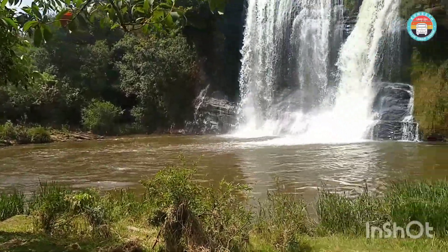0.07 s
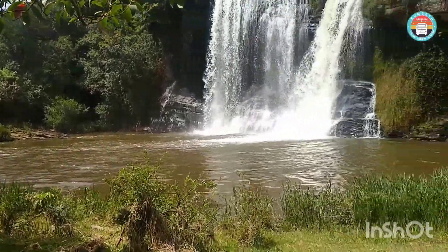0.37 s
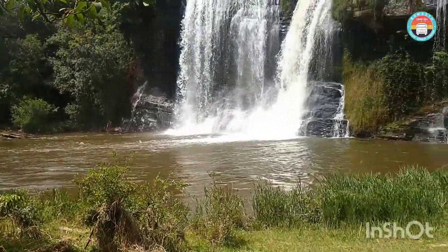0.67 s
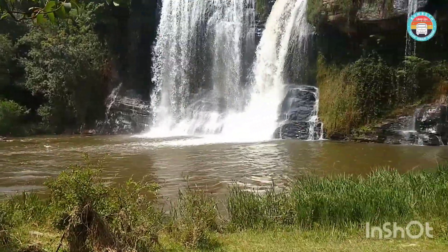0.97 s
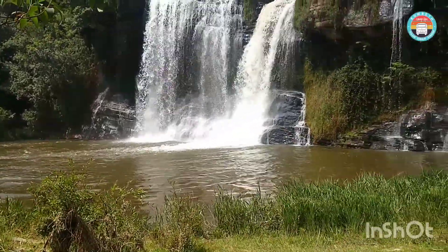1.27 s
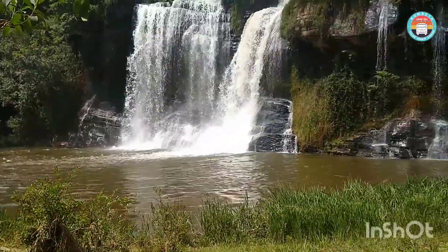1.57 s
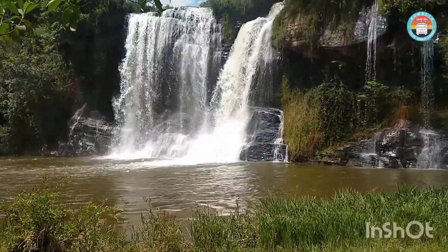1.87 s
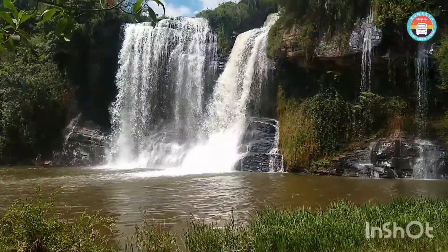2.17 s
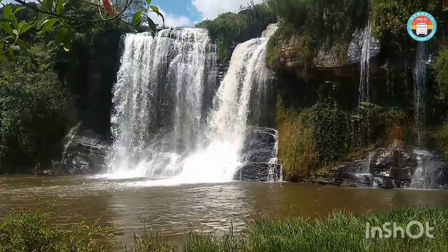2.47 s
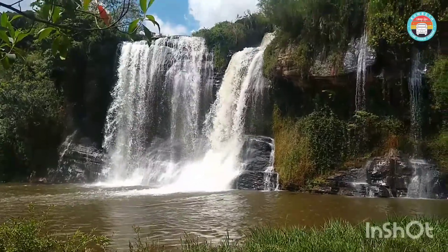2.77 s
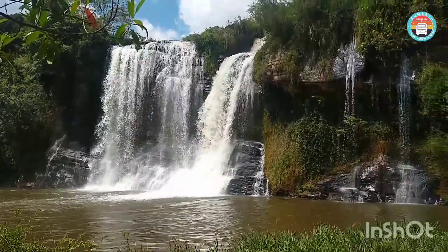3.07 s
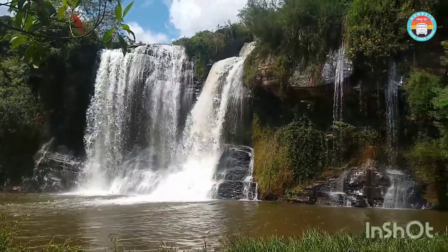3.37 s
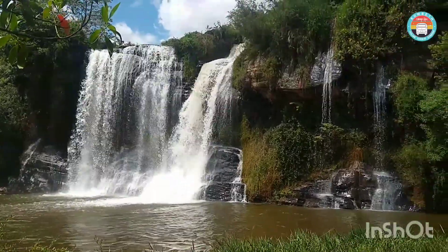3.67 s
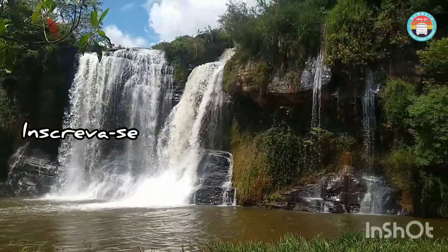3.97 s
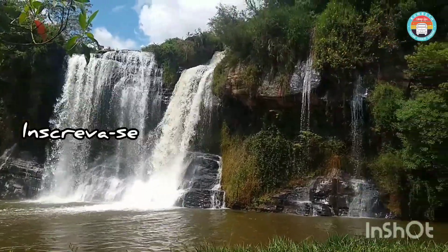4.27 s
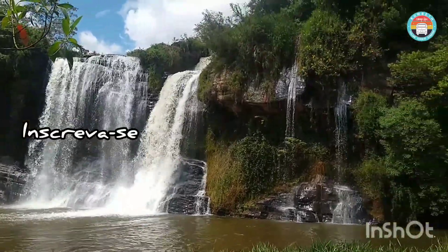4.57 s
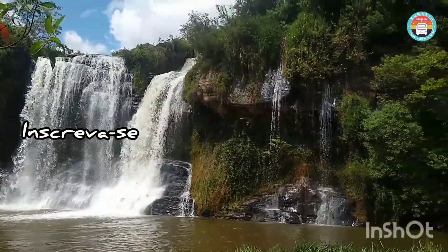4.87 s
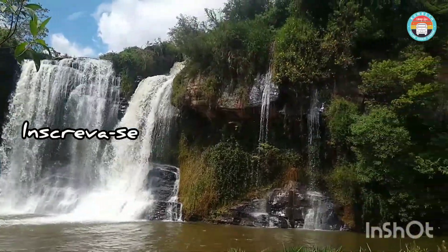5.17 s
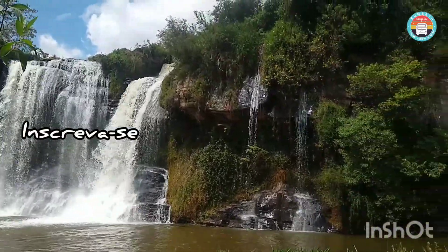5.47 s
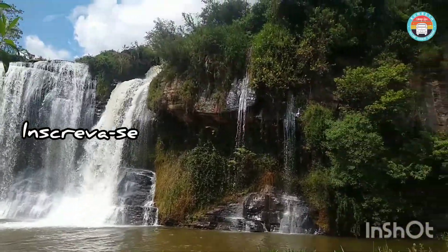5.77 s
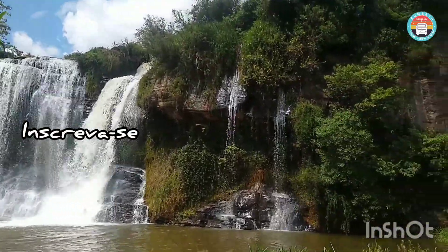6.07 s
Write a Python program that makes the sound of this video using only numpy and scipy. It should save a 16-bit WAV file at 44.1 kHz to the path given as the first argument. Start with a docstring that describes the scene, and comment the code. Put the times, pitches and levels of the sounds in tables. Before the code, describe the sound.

Falling water roars from start to finish, a dense, even rush with a deep plunge underneath and hissing spray on top. It is picked up in stereo from the bank of an open-air pool facing the waterfall. The flow swells very slightly near the start, then holds steady. Toward the end the microphone swings gradually aside, so the low rumble and rush ease while the hiss lingers.

```python
"""A wide waterfall drops over a cliff into a pool, heard across the water from a grassy bank.
From the start the plunge booms, the falling sheets rush and the spray hisses, all shaped from noise
and coloured by the ground's reflection. Just before one second, a heavier surge swells and subsides.
The two-port microphone keeps slowly turning away, so towards the end the roar fades and shifts in tone."""
import sys
import numpy as np
from scipy import signal
from scipy.io import wavfile
from scipy.ndimage import uniform_filter1d

SR = 44100
rng = np.random.default_rng(int(sys.argv[2]) if len(sys.argv) > 2 else 0)


def generate_wav(signal):
    """Clip the signal to [-1, 1] and save it as 16-bit WAV at the path in sys.argv[1]."""
    frames = np.transpose(np.atleast_2d(signal))
    scaled = np.clip(frames, -1, 1) * 32767
    pcm = np.round(scaled).astype(np.int16)
    wavfile.write(sys.argv[1], SR, pcm)


N = 269451
FRAME, HOP = 2048, 512  # samples
HZ = np.fft.rfftfreq(FRAME, 1 / SR)
TIMES = np.arange(N // HOP + 2) * HOP / SR
PLUNGE_TO_RUSH_HZ, RUSH_TO_SPRAY_HZ = (248, 500), (4240, 6850)  # crossovers between the layers

# Base tone of the roar, facing the fall: (frequency [Hz], level [dB per Hz])
ROAR_SPECTRUM = [(20, -96), (42, -101), (72, -77), (160, -61), (600, -62), (1050, -60.5), (1380, -64.5),
                 (1650, -63.5), (2450, -62.5), (3000, -59.5), (3380, -57.5), (3900, -62.5), (4400, -70.3),
                 (5000, -75.6), (6800, -79.5), (7900, -81.5), (9200, -79.5), (10200, -78), (12000, -81),
                 (15000, -87.5)]
def waterfall():
    """Amplitude of the roar over time and frequency: boom, rush and hiss ride on one flow."""
    layers_db = plunge() + sheets() + clumps() + spray()
    return gain_of(over_hz(ROAR_SPECTRUM) + layers_db + flow())


def plunge():
    """Low end, in dB: the boom of water hitting the pool fades with the turn."""
    return (1 - crossover(*PLUNGE_TO_RUSH_HZ)) * fade(turned_db=-9, hold=2.3)


def sheets():
    """Midrange, in dB: the rush of the falling sheets fades slightly ahead of the boom."""
    band = crossover(*PLUNGE_TO_RUSH_HZ) - crossover(*RUSH_TO_SPRAY_HZ)
    return band * fade(turned_db=-9, hold=2.11)


def clumps(depth_db=0.87):
    """Texture, in dB: water lands in clumps, roughening the lows and mids."""
    return depth_db * (1 - crossover(1800, 2800)) * patches(frames=6, bins=24)


def spray(flicker_db=1.4):
    """Top end, in dB: the spray fades least; the hiss flickers slightly at random."""
    flicker = flicker_db * patches(frames=4, bins=20)
    return crossover(*RUSH_TO_SPRAY_HZ) * (fade(turned_db=-4.5, hold=3) + flicker)


def flow(surge_s=0.79, surge_width_s=0.37, surge_db=0.6, waver_db=0.25):
    """Level ride, in dB: the water pours almost evenly, with one surge and a slight random waver."""
    rates_hz = np.geomspace(2, 14, 20)
    waver = sum(np.sin(2 * np.pi * (hz * TIMES + rng.random())) / np.sqrt(hz) for hz in rates_hz)
    surge = np.exp(-((TIMES - surge_s) / surge_width_s) ** 2)
    return (surge_db * surge + waver_db * waver / waver.std())[:, None]


def splashes():
    """Countless overlapping splashes blur into white noise, made as short-time spectra."""
    real, imaginary = rng.standard_normal((2, len(TIMES), len(HZ)))
    return real + 1j * imaginary


def ground_reflection(mid_turn_delay_s=0.002074, strength=0.42, grass_cutoff_hz=1480, phase_rad=1.27):
    """The bounce off the bank comb-filters the roar; grass soaks up the bounce's treble."""
    bounce = strength * np.exp(-(HZ / grass_cutoff_hz) ** 3)
    # the detour shortens as the microphone moves, so the notches drift upwards
    delay_s = mid_turn_delay_s * (1 - 0.063 * (turn() - .5))
    return abs(1 - bounce * np.exp(-1j * (2 * np.pi * HZ * delay_s + phase_rad)))


# The microphone's slow swing: (time [s], turn [0-1])
TURN_CURVE = [(0, 0), (.6, 0.15), (2.6, 0.47), (6.11, 1)]
def turn():
    """How far the microphone has turned, one row per frame: 0 faces the fall, 1 is fully turned."""
    return np.interp(TIMES, *np.transpose(TURN_CURVE))[:, None]


def fade(turned_db, hold):
    """A layer's fade in dB as the microphone turns; a higher hold keeps it up longer."""
    return turned_db * turn() ** hold


# How alike the two ports sound: (frequency [Hz], coherence [0-1])
PORT_COHERENCE = [(45, 0.5), (90, 0.92), (170, 0.96), (300, 0.95), (385, 0.62), (460, 0.88), (620, 1),
                  (840, 0.9), (1000, 1), (1200, 1), (1400, 0.9), (2200, 0.99), (3300, 0.95), (4450, 1),
                  (5000, 0.88), (5550, 0.9), (6150, 0.8), (6700, 0.8), (8700, 0.85), (10600, 0.7),
                  (12000, 0.2), (15000, 0.4)]
# How far the left port trails the right at mid-turn: (frequency [Hz], phase [rad])
LEFT_LAG = [(100, 0), (340, 0.6), (420, -0.6), (600, 0), (800, 0.3), (900, -0.15), (1200, 0), (1650, 0.9),
            (1900, 1.85), (2190, 3.14), (3320, 6.28), (4420, 9.42), (6660, 15.7), (8730, 22), (10650, 28.3),
            (12700, 34.6), (13200, 36.9), (13750, 37.7), (14350, 40.8), (15200, 44)]
# Stereo width of the hiss, the share with the left-right lag reversed: (frequency [Hz], share [0-1])
REVERSED_LAG_SHARE = [(1400, 0.24), (1900, 0.17), (2700, 0.1), (3900, 0.1), (5000, 0.24), (7300, 0.2),
                      (8300, 0.35), (10000, 0.06), (13000, 0.3)]
def stereo_splashes(narrowing=1.2, diffuse_loss=0.95):
    """Stereo width: both ports hear nearly the same splashes, the left one later."""
    past_mid_turn = turn() - .5
    # the body of the roar narrows with the turn
    body = 1 - crossover(1400, 1940)
    lag = np.interp(HZ, *np.transpose(LEFT_LAG)) * (1 - narrowing * body * past_mid_turn)
    # the diffuse wash, unrelated between the ports, shrinks too
    diffuse = np.clip((1 - over_hz(PORT_COHERENCE)) * (1 - diffuse_loss * past_mid_turn), 0, 1)
    # a share with its lag reversed widens the image
    flipped = over_hz(REVERSED_LAG_SHARE)
    shared = (1 - diffuse) * ((1 - flipped) * np.exp(-1j * lag) + flipped * np.exp(1j * lag))
    right = splashes()
    left = shared * right + np.sqrt(np.maximum(1 - abs(shared) ** 2, 0)) * splashes()
    return left, right


# Base pan of each band: (frequency [Hz], left over right [dB])
PORT_BALANCE = [(60, 0), (200, 2.6), (300, -2.5), (385, -4.5), (470, 0.5), (620, 1.2), (750, -1.5),
                (850, -0.5), (1000, 0), (1350, 0.5), (2400, 1), (3300, -1.1), (3950, -2), (4450, -0.7),
                (6000, 0.8), (9400, 2), (11500, 0.7), (14000, 0.5)]
def pan(left, right, facing_db=2.1, shade_db=-8.0, bass_swing_db=3):
    """Equal-power pan: turning shades the left port's midrange and drifts the bass to the left."""
    shadow_db = (facing_db + shade_db * turn() ** 2) * bell(centre_hz=1770, width_hz=230)
    bass_db = bass_swing_db * (1 - crossover(300, 900)) * (turn() - .5)
    ratio = gain_of(over_hz(PORT_BALANCE) + shadow_db + bass_db)
    return np.array([ratio * left, right]) * np.sqrt(2 / (1 + ratio ** 2))


# EQ of the fully turned microphone: (frequency [Hz], gain [dB])
OFF_AXIS_EQ = [(60, 0), (200, -1.0), (600, -0.2), (1100, 1.85), (1400, 2.5), (1900, 0.4), (2300, 4.5),
               (2700, 2.5), (3350, -0.8), (3900, -1), (4500, 8), (5700, 5.5), (7200, 0.1), (9000, -4),
               (15000, -4.6)]
def off_axis_tone():
    """The off-axis colour blends in as the microphone turns away."""
    return gain_of(turn() * over_hz(OFF_AXIS_EQ))


def body_notch(start_hz=2515, glide_hz=740, depth_db=-3.0):
    """Sound bending round the microphone's body cuts a notch that sweeps down with the turn."""
    return gain_of(depth_db * bell(start_hz - glide_hz * turn() ** 2, width_hz=380))


def hiss_peak(start_hz=4750, glide_hz=1150, boost_db=1.64):
    """A mild peak in the hiss slides down as the microphone turns."""
    return gain_of(boost_db * bell(start_hz - glide_hz * turn() ** 2, width_hz=380))


def gain_of(db):
    """Decibels to amplitude."""
    return 10 ** (db / 20)


def over_hz(points):
    """A table joined by straight lines on a log-frequency axis."""
    hz, value = np.transpose(points)
    return np.interp(np.log(HZ + 1), np.log(hz + 1), value)


def crossover(low_hz, high_hz):
    """A blend that rises from 0 to 1 between two frequencies."""
    return over_hz([(low_hz, 0), (high_hz, 1)])


def bell(centre_hz, width_hz):
    """An EQ bell of height 1."""
    return np.exp(-((HZ - centre_hz) / width_hz) ** 2)


def patches(frames, bins):
    """Random grain of unit spread, smoothed over time and frequency."""
    grain = rng.standard_normal((len(TIMES), len(HZ)))
    grain = uniform_filter1d(grain, frames, axis=0)
    grain = uniform_filter1d(grain, bins, axis=1)
    return grain / grain.std()


def scene():
    """The roar crosses the pool and the bank and reaches both ports of the turning microphone."""
    roar = waterfall() * ground_reflection()
    left, right = stereo_splashes()
    ports = pan(left * body_notch(), right)
    spectra = (ports * roar * hiss_peak() * off_axis_tone()).swapaxes(1, 2)
    _, stereo = signal.istft(spectra, SR, nperseg=FRAME, noverlap=FRAME - HOP, scaling="psd")
    return stereo[:, :N]


def record(dry, cutoff_hz=15550):
    """A steep low-pass trims the very top of the hiss."""
    low_pass = signal.firwin(1023, cutoff_hz, window=("kaiser", 9), fs=SR)
    return signal.oaconvolve(dry, low_pass[None], "same", axes=1)


dry = scene()
out = record(dry)
generate_wav(out)
```